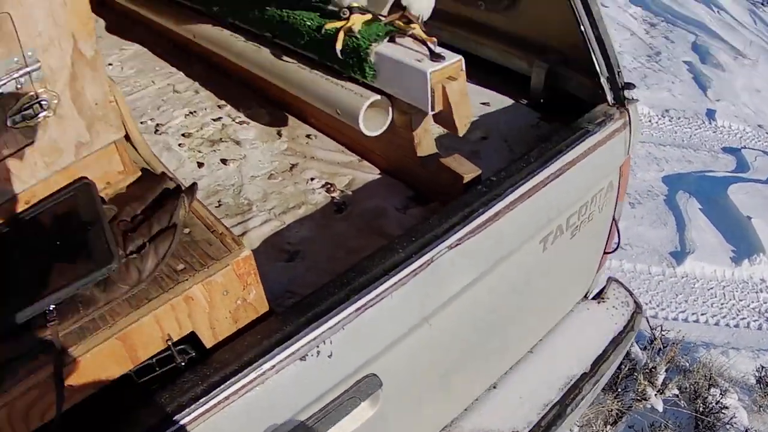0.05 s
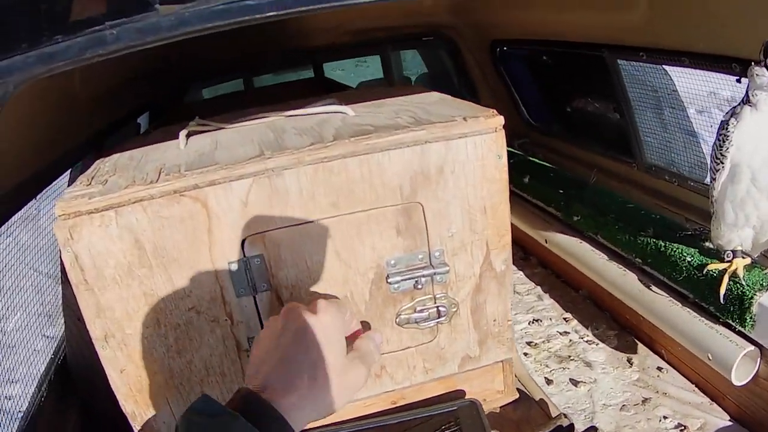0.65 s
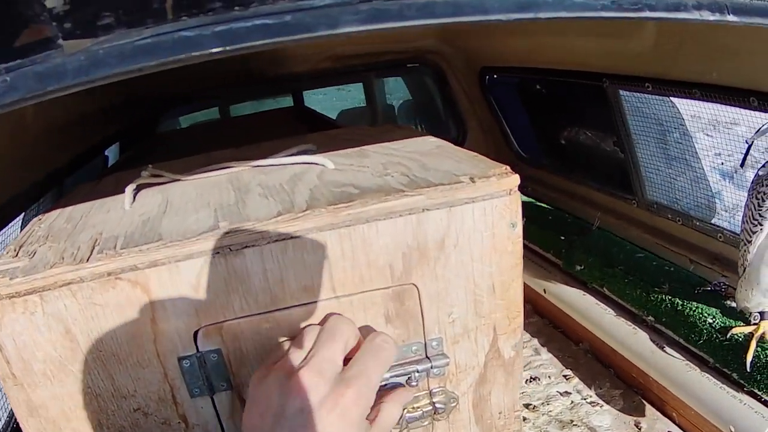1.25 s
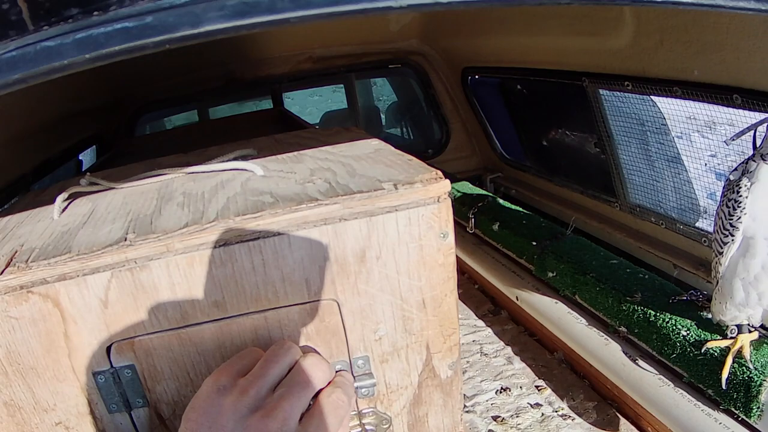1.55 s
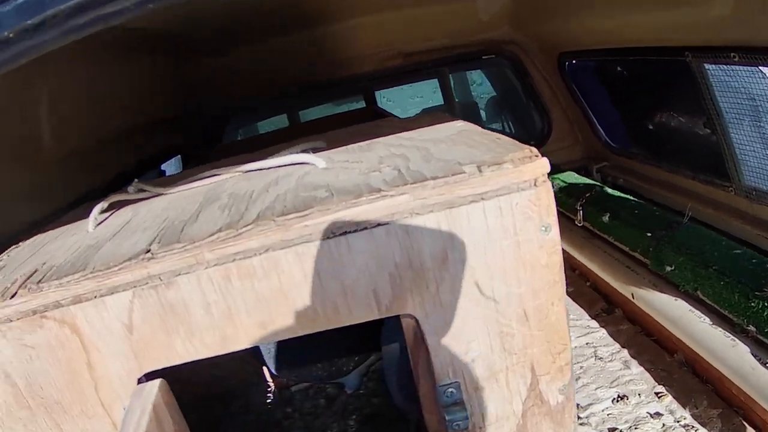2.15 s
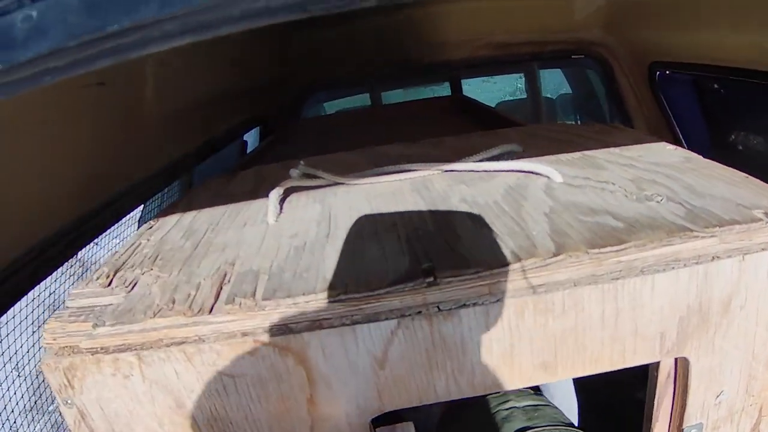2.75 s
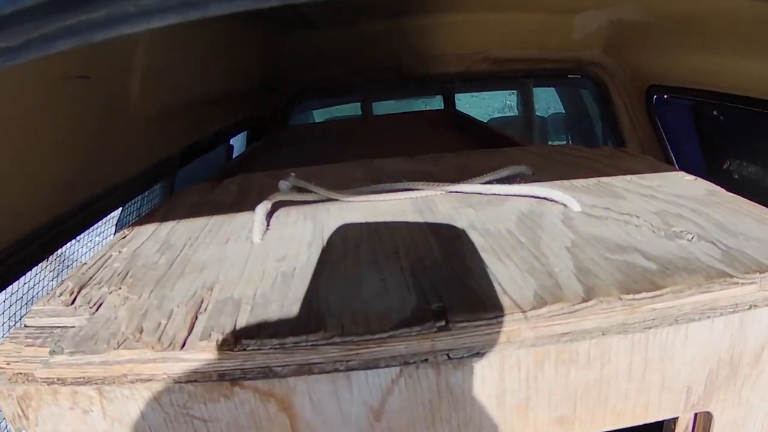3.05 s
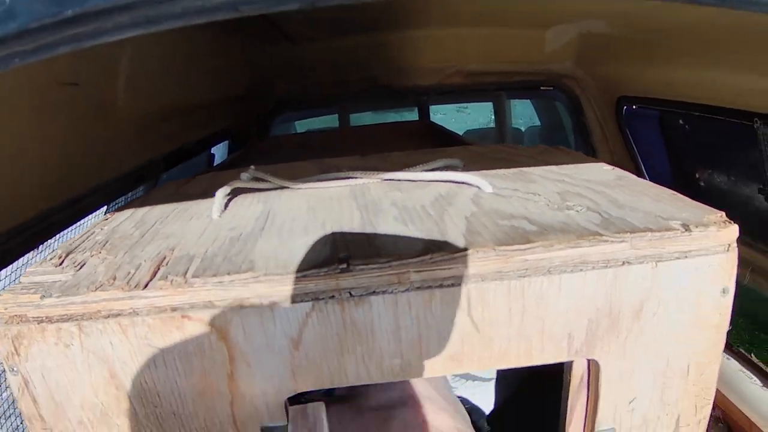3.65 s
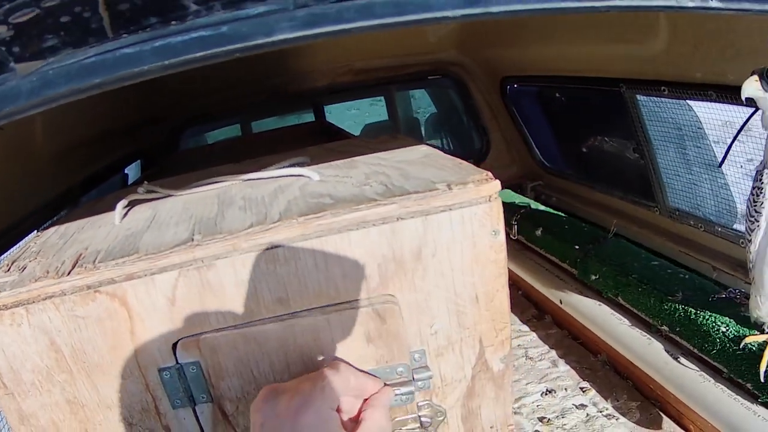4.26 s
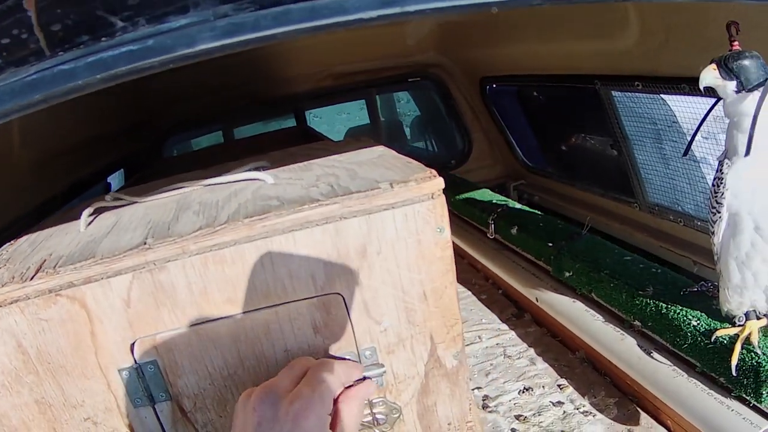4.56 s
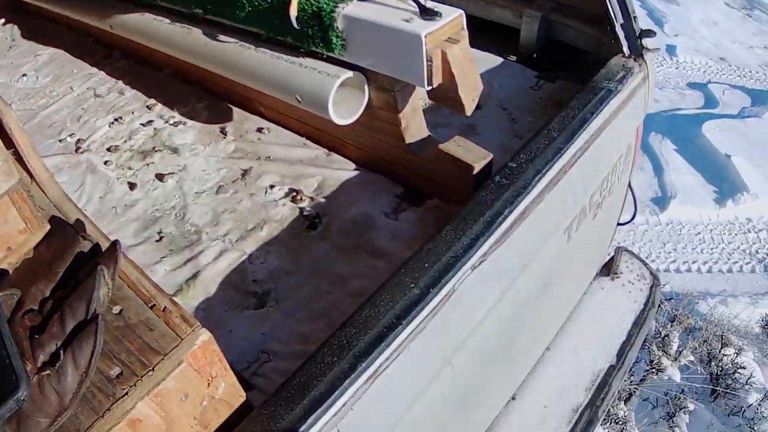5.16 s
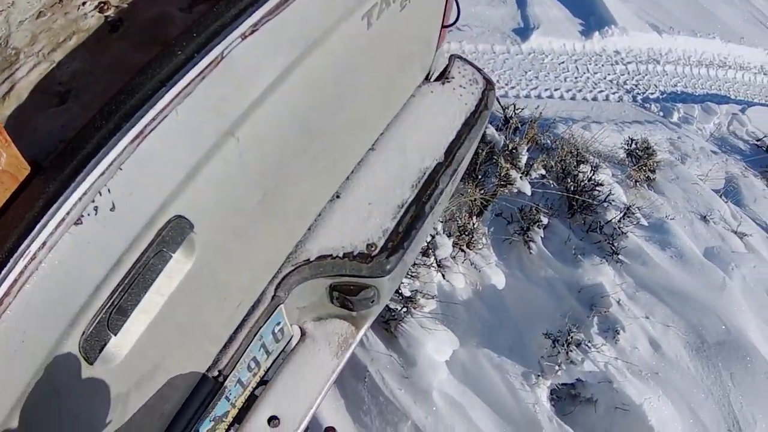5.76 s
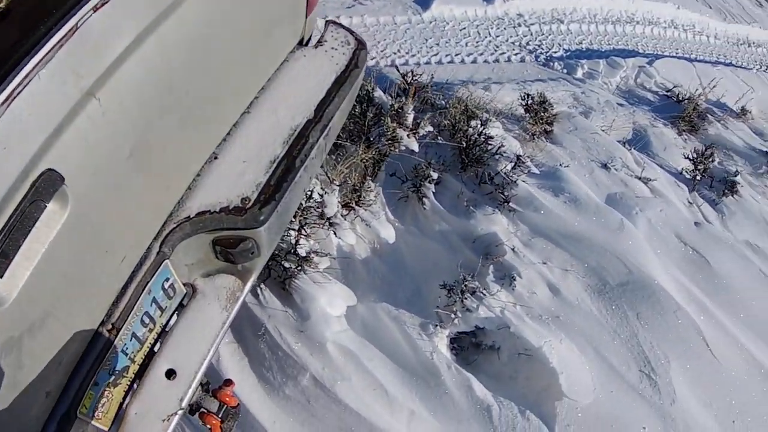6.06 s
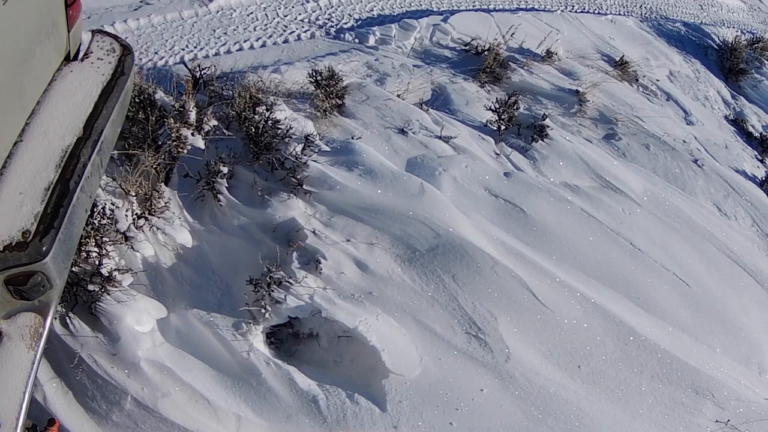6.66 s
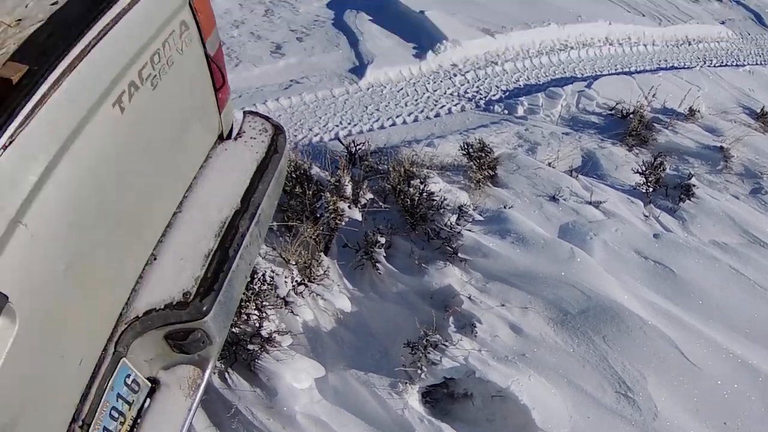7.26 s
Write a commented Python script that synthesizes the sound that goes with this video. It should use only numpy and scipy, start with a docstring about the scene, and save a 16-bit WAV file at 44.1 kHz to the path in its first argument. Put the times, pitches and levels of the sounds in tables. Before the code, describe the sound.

Close latch clacks, hollow wooden bumps and scraping, a brief hinge squeak and a shutting door, followed by creaking footsteps on cold snow.

```python
"""Close by, in quiet open air, boots crunch and creak in cold snow at the back of a pickup.
A steel bolt rattles and rasps open on a plywood box; a hand reaches in and drags something out,
bumping and rubbing the panels. The dry hinge squeaks, the small door claps shut, the bolt is
worked home and a dull thump follows. The boots shuffle again, packing snow and brushing powder.
A faint outdoor rush runs throughout, with two brief, thin whines."""
import sys
import numpy as np
from scipy import signal
from scipy.fft import rfft, irfft, next_fast_len
from scipy.io import wavfile
from scipy.ndimage import uniform_filter1d, minimum_filter1d, map_coordinates

SR = 44100
rng = np.random.default_rng(int(sys.argv[2]) if len(sys.argv) > 2 else 0)


def wav_out(sig):
    """Save sig, one row per channel (or a flat mono array), as 16-bit PCM at SR to the path in sys.argv[1]."""
    wavfile.write(sys.argv[1], SR, np.round(np.clip(np.atleast_2d(sig).T, -1, 1) * 32767).astype(np.int16))


N = 326781

# bolt and door contacts: start_s, clack_db, boom_re_clack_db, crack_re_clack_db
DOOR_KNOCKS = [(0.854, -8.5, -4, -15.5), (0.866, -16, 6.5, -8.5), (0.874, -13, 4, -9.5),
               (0.909, -20.5, -9, -12), (1.014, -10.5, -1, -13.5), (1.059, -16, 5, -23),
               (1.07, -4.5, 0.5, -16), (1.074, -21.5, 8, -8.5), (1.114, -32.5, 9, -3.5),
               (1.297, -31.5, 3, -20.5), (1.38, -35, 0, -14), (1.457, -16, 2, -18), (1.489, -11.5, -9, -18),
               (1.531, -12.5, -4.5, -14), (1.546, -20.5, -12, -14), (3.343, -19.5, -4, -13),
               (4.288, -37, 7, -28), (4.344, -9.5, 3.5, -24.5), (4.417, -13.5, -5, -19),
               (4.458, -6, 2.5, -14.5), (4.679, -20, -3, -21), (4.794, -10, 0, -19),
               (5.18, -20.5, -1.5, -36), (5.679, -27, 7, -7.5), (5.733, -30.5, -14, -17)]
# bolt and small hard parts: start_s, level_db, pitch_hz
BOLT_CLICKS = [(0.877, -27.5, 5700), (1.015, -18.5, 5320), (1.645, -38.5, 2750), (1.674, -33, 1920),
               (1.711, -26.5, 2330), (1.882, -29.5, 2034), (1.968, -36, 1620), (2.839, -45, 1890),
               (3.06, -36.5, 2010), (4.194, -46, 5000), (4.457, -18, 3580), (4.801, -31.5, 6060),
               (5.185, -41, 4970), (5.404, -48, 5400), (6.101, -37, 5030)]
# hard edges in stick-slip: centre_s, length_s, squawk_db, zing_db
EDGE_RASPS = [(0.863, 0.021, -24, -36), (1.01, 0.029, -33, -29), (1.449, 0.0079, -39, -35.5),
              (1.507, 0.029, -19, -37), (1.707, 0.019, -22.5, -28), (3.414, 0.027, -29.5, -26.5),
              (3.752, 0.032, -32.5, -41.5), (4.785, 0.012, -27, -35), (4.866, 0.028, -27, -30)]
# soft contacts with box and truck: start_s, level_db, pitch_hz
SOFT_BUMPS = [(1.16, -22.5, 976), (1.162, -13, 451), (1.171, -15, 210), (1.75, -18.5, 324),
              (1.845, -15, 237), (1.856, -16, 311), (1.876, -23, 318), (1.966, -33.5, 255),
              (2.614, -28.5, 748), (2.678, -23, 756), (2.692, -12.5, 180.5), (2.764, -19, 193),
              (3.008, -28, 730), (3.108, -28, 406), (3.187, -23.5, 215), (3.23, -18.5, 337),
              (3.313, -17, 760), (3.345, -11, 642), (3.508, -19, 306), (3.749, -13.5, 192),
              (4.359, -23, 307), (4.526, -28, 1126), (4.529, -12.5, 263), (4.953, -21.5, 310),
              (5.153, -17, 214), (5.566, -13.5, 290), (5.578, -7.5, 312), (5.585, -3.5, 124),
              (5.596, -6.5, 182.4), (5.67, -15, 197.5)]
# hand sliding on plywood: start_s, length_s, panel_db, scrape_db
HAND_STROKES = [(0.89, 0.2, -31.5, -36.5), (1.292, 0.29, -41, -45.5), (1.705, 0.057, -29, -34),
                (1.822, 0.037, -23.5, -36.5), (1.919, 0.046, -39.5, -35.5), (2.71, 0.053, -30.5, -32),
                (4.077, 0.13, -48, -54), (4.849, 0.13, -39, -43.5), (5.075, 0.1, -43, -53),
                (5.633, 0.074, -34.5, -34)]
# load sliding over the box floor: time_s, panel_db, scrape_db
LOAD_DRAG = [(2.82, -40, -43), (2.985, -45, -45.5), (3.018, -32.5, -34.5), (3.262, -27.5, -34.5),
             (3.29, -37, -31.5), (3.344, -16.5, -33), (3.398, -35.5, -28.5), (3.488, -23, -25),
             (3.6, -46.5, -56)]
# hinge swells: centre_s, length_s, level_db
HINGE_SQUEALS = [(4.002, 0.019, -34), (4.033, 0.036, -31.5), (4.087, 0.023, -38), (4.124, 0.042, -37.5)]
# boot loading the snow: start_s, length_s, level_db, pitch_hz
BOOT_STEPS = [(0.065, 0.18, -55.5, 1240), (0.388, 0.22, -38, 740), (6.19, 0.046, -40.5, 1210),
              (6.325, 0.06, -45, 1110), (6.511, 0.27, -37, 660), (6.777, 0.26, -37.5, 440),
              (7.05, 0.082, -38.5, 720), (7.213, 0.1, -44, 814), (7.294, 0.021, -37, 910)]
# boot brushing powder: start_s, length_s, level_db
BOOT_SWEEPS = [(6.6, 0.13, -42), (6.78, 0.22, -39.5), (6.826, 0.086, -41.5)]
# packed snow collapsing: start_s, level_db, pitch_hz
SNOW_CREAKS = [(0.085, -36.5, 1130), (0.572, -22, 720), (0.598, -17, 790), (0.61, -15, 723),
               (6.36, -33.5, 1130), (6.407, -28, 870), (6.701, -21, 442), (6.899, -22.5, 1090),
               (6.988, -23, 310), (7.058, -27.5, 840), (7.099, -21, 613), (7.299, -29, 994)]
# whine swells: centre_s, level_db
WHINE_SWELLS = [(2.101, -59), (5.209, -52.5)]

# modes: pitch_hz, level_db, t60_s
PANEL_MODES = [(128.5, -15.5, 0.25), (173, -12, 0.27), (201.7, 6, 0.086), (238.4, 3, 0.041),
               (302.7, -6.5, 0.22), (357, -6, 0.19), (472, 0.5, 0.11)]  # plywood and enclosed air
DOOR_MODES = [(539.4, 4.5, 0.18), (621, 9, 0.13), (900, 7, 0.1), (996, -7, 0.15), (1297, 6.5, 0.1),
              (1835, 11.5, 0.048), (1920, -4.5, 0.11), (2140, 1.5, 0.049), (2465, -12, 0.056)]  # door with hinge plates
BOLT_MODES = [(3654, 24, 0.027), (3810, 10, 0.059), (5166, 17.5, 0.066), (5700, -2, 0.057)]

# spectral shapes: freq_hz, density_db
PANEL_BOOM = [(50, -53.5), (120, -4), (200, 4.5), (330, 1.5), (480, -9.5), (800, -28.5), (2000, -71.5)]
DOOR_CLACK = [(150, -29), (350, -15), (550, -5), (1000, -1), (1500, -8.5), (2000, -15.5), (2600, -18.5),
              (3300, -21), (7000, -97)]
STEEL_CRACK = [(1000, -31), (2400, -1.5), (3000, -12), (3600, -1), (4600, -3.5), (5400, -2), (6300, -8.5),
               (7500, -24), (10500, -29.5), (15500, -24)]
WOOD_SCRAPE = [(200, -50), (450, 6), (650, 9.5), (900, 4), (1200, 1.5), (2400, -19.5), (3200, -33),
               (7000, -61)]
SNOW_CRUNCH = [(60, -54.5), (140, 7), (300, 7.5), (750, 2.5), (1100, 2), (1900, -7), (2700, -25.5),
               (15000, -36.5)]
POWDER_HISS = [(900, 1), (2000, -1), (2900, -17.5), (3700, -3.5), (4200, -10.5), (4750, -20.5), (5700, -9),
               (6400, -16.5), (7500, -27.5), (15500, -36)]
AIR_RUSH = [(60, -34.5), (130, -14.5), (350, -13.5), (520, -15.5), (1400, -21.5), (2500, -26.5),
            (15500, -35.5)]
# spectral shape of a click: pitch_ratio, density_db
CLICK_SNAP = [(.12, -11), (.3, 12.5), (.55, -6.5), (1, 7.5), (1.5, -7), (2.1, -9), (4, -35.5)]

TIME_S = np.arange(N) / SR
AGE_S = np.arange(SR // 2) / SR  # time axis of one short sound


def knocks(rebound_gap_s=.023, rebound_db=-14):
    """Steel cracks, the door clacks, the panels swing up and boom; the loose bolt rebounds twice."""
    out = np.zeros(N)
    boom, clack, crack = response(PANEL_BOOM), response(DOOR_CLACK), response(STEEL_CRACK)
    for start_s, level_db, boom_db, crack_db in DOOR_KNOCKS:
        steel = clatter(crack, t60_s=.03, tail_db=-16, tail_t60_s=.11)
        steel += .55 * ring(BOLT_MODES, attack_s=.0006)
        door = amp(-11) * clatter(clack, t60_s=.075, tail_db=-15, tail_t60_s=.16)
        door += amp(-12) * ring(DOOR_MODES, attack_s=.0005)
        panels = amp(-5.5) * ring(PANEL_MODES, attack_s=.009)
        panels += amp(-6.5) * clatter(boom, t60_s=.07, tail_db=-5, tail_t60_s=.23)
        add(out, start_s, amp(level_db) * (door + amp(crack_db - 1.5) * steel + amp(boom_db) * panels))
        delays_s = np.cumsum(rebound_gap_s * (.5 + rng.random(2)))
        for bounce, delay_s in enumerate(delays_s, 1):
            tick = clatter(crack, t60_s=.011, tail_db=-20, tail_t60_s=.26)
            add(out, start_s + delay_s, amp(level_db + crack_db + bounce * rebound_db) * tick)
    return out


def clicks():
    """Hard parts meet with no panel behind them: a snap and ping, higher for smaller parts."""
    out = np.zeros(N)
    for start_s, level_db, pitch_hz in BOLT_CLICKS:
        colour = response([(pitch_hz * ratio, db) for ratio, db in CLICK_SNAP])
        ping = .5 * ring([(pitch_hz, 0, 110 / pitch_hz)], attack_s=1 / pitch_hz)
        snap = clatter(colour, t60_s=.022, tail_db=-11, tail_t60_s=.13)
        add(out, start_s, amp(level_db) * (ping + snap))
    return out


def rasps(slip_hz=1000, waver=.25):
    """An uneven run of slips drives the steel and the door's upper modes, damped by the contact."""
    out, crack = np.zeros(N), response(STEEL_CRACK)
    upper_modes = [mode for mode in DOOR_MODES if mode[0] > 950]
    damping = decay(t60_s=.012)
    for centre_s, length_s, squawk_db, zing_db in EDGE_RASPS:
        rate_hz = slip_hz * (1 + waver * wobble(600)[:len(AGE_S)])
        pulses = np.diff(np.floor(np.cumsum(rate_hz) / SR), prepend=0)
        force = swell(AGE_S - length_s, length_s) * pulses * (1 + rng.standard_normal(len(AGE_S)))
        squawk = burst(convolve(force, damping * ring(upper_modes, attack_s=.000047)))
        bolt = burst(convolve(force, damping * ring(BOLT_MODES, attack_s=.00084)))
        zing = burst(convolve(force, crack)) + .5 * bolt
        add(out, centre_s - length_s, amp(squawk_db) * squawk + amp(zing_db) * zing)
    return out


def bumps():
    """A soft contact stirs one mode of the hollow box above the rest; low modes ring longer."""
    out = np.zeros(N)
    for start_s, level_db, hz in SOFT_BUMPS:
        colour = response([(hz / 2.4, -26), (hz, 0), (hz * 1.8, -12), (hz * 5, -42), (hz * 14, -90)])
        mode = amp(-8.5) * ring([(hz, 0, 36 / hz)], attack_s=.7 / hz)
        thud = amp(-7) * clatter(colour, t60_s=.09, tail_db=-21, tail_t60_s=.35)
        add(out, start_s, amp(level_db) * (mode + thud))
    return out


def rubbing(hiss_db=-10, hard_scrape_db=-17):
    """Coarse slips shake the panels, finer ones scrape, and cloth hisses over the wood."""
    panel_gain, scrape_gain = friction_gains()
    grip = unit(amp(3.8 * wobble(36)))
    fine = grip * slips(rate_hz=350, spread_db=3.5, smooth=.5)
    lower_modes = [mode for mode in DOOR_MODES if mode[0] < 1100]
    wood = through(fine, WOOD_SCRAPE)
    wood += amp(-12) * unit(convolve(fine, ring(lower_modes, attack_s=.00093)))
    hiss_gain = amp(hiss_db) * np.sqrt(scrape_gain / amp(hard_scrape_db))  # fades faster than the scrape
    hiss = hiss_gain * through(grip * rng.standard_normal(N), STEEL_CRACK)
    # a faint, even hiss swells with the rubbing
    faint_hiss = amp(-45) * np.sqrt(panel_gain + scrape_gain) * rng.standard_normal(N)
    rumble = through(slips(rate_hz=260, spread_db=0, smooth=.47), PANEL_BOOM)
    return amp(3.5) * panel_gain * rumble + amp(.5) * scrape_gain * (wood + hiss) + faint_hiss


def friction_gains():
    """Panel and scrape envelopes: the dragged load and the hand strokes add in power."""
    times_s, drag_panel_db, drag_scrape_db = np.transpose(LOAD_DRAG)
    inside_s = np.minimum(TIME_S - times_s[0], times_s[-1] - TIME_S)
    gate = np.clip(1 + inside_s / .02, 0, 1)
    panel = gate * amp(np.interp(TIME_S, times_s, drag_panel_db) - 1.5)
    scrape = gate * amp(np.interp(TIME_S, times_s, drag_scrape_db) + 1)
    for start_s, length_s, panel_db, scrape_db in HAND_STROKES:
        stroke = press(start_s, length_s, attack_s=.019, release_db_per_s=181)
        panel = np.hypot(panel, amp(panel_db) * stroke)
        scrape = np.hypot(scrape, amp(scrape_db) * stroke)
    return panel, scrape


def hinge():
    """The dry hinge sings one wavering note in short swells as the door swings shut."""
    envelope = sum(amp(db) * swell(TIME_S - centre_s, length_s)
                   for centre_s, length_s, db in HINGE_SQUEALS)
    pitch_hz = 1495 * (1 + .022 * wobble(200))
    flutter = amp(3.1 * wobble(130))
    return envelope * flutter * tone(pitch_hz)


def boots(packing_db=-1, packing_q=2.5):
    """Snow crystals break in clumps under the sole, each push on its own note; loose powder hisses."""
    breaking = slips(rate_hz=550, spread_db=3.5, smooth=.35) * amp(3.5 * wobble(70))
    crunch, dust = through(breaking, SNOW_CRUNCH), through(breaking, POWDER_HISS)
    out = np.zeros(N)
    for start_s, length_s, level_db, pitch_hz in BOOT_STEPS:
        note = unit(signal.lfilter(*signal.iirpeak(pitch_hz, packing_q, SR), crunch))
        push = amp(level_db) * press(start_s, length_s, attack_s=.0033, release_db_per_s=224)
        out += push * (unit(crunch + amp(packing_db) * note) + amp(-17) * dust)
    sweep = sum(amp(db) * press(start_s, length_s, attack_s=.04, release_db_per_s=323)
                for start_s, length_s, db in BOOT_SWEEPS)
    powder = through(slips(rate_hz=3400, spread_db=3.5, smooth=.69), POWDER_HISS)
    return out + sweep * powder


def creaks():
    """A packed snow layer collapses at once: a pop sinking in pitch, with a short crumble behind it."""
    out, crunch = np.zeros(N), response(SNOW_CRUNCH)
    for start_s, level_db, pitch_hz in SNOW_CREAKS:
        cycles = pitch_hz * AGE_S[:SR // 20]
        glide_hz = pitch_hz * (1 + .056 * np.exp(-cycles / 2))
        pop = cycles * np.exp(1 - cycles) * tone(glide_hz)
        crumble = clatter(crunch, t60_s=.052, tail_db=-18, tail_t60_s=.083)
        add(out, start_s, amp(level_db + 3) * pop)
        add(out, start_s, amp(level_db - 15) * crumble)
    return out


def air():
    """A faint outdoor rush."""
    return amp(-54.5) * through(rng.standard_normal(N), AIR_RUSH)


def whine(pitch_hz=5860):
    """A very faint, thin whine comes and goes."""
    envelope = sum(amp(db) * swell(TIME_S - centre_s, length_s=.08) for centre_s, db in WHINE_SWELLS)
    return envelope * np.sin(2 * np.pi * pitch_hz * TIME_S)


def ring(modes, attack_s):
    """Modes struck at random strengths and signs; the hand's grip detunes each a little."""
    hz, db, t60_s = np.transpose(modes)[:, :, None]
    strength = amp(db + rng.normal(0, 4, hz.shape)) * rng.choice([-1, 1], hz.shape)
    pitch_hz = hz * (1 + .0072 * rng.standard_normal(hz.shape))
    partials = strength * decay(t60_s) * np.sin(2 * np.pi * pitch_hz * AGE_S)
    return burst(partials.sum(axis=0) * (1 - np.exp(-AGE_S / attack_s)))


def clatter(colour, t60_s, tail_db, tail_t60_s):
    """Crowded modes that die fast, and their weaker echo under the truck's canopy."""
    envelope = decay(t60_s) + amp(tail_db) * decay(tail_t60_s)
    return burst(convolve(envelope * rng.standard_normal(len(AGE_S)), colour))


def slips(rate_hz, spread_db, smooth):
    """Random tiny slips of uneven size over a share of smooth friction noise."""
    sizes = rng.choice([-1, 1], N) * amp(spread_db * np.minimum(rng.exponential(size=N), 3))
    slipping = rng.random(N) < rate_hz / SR
    return unit(sizes * slipping) + smooth * rng.standard_normal(N)


def press(start_s, length_s, attack_s, release_db_per_s):
    """Pressure builds, holds to the end of the movement and dies away."""
    age_s = TIME_S - start_s
    return np.clip(age_s / attack_s, 0, 1) * amp(-release_db_per_s * np.maximum(age_s - length_s, 0))


def swell(offset_s, length_s):
    """Gaussian envelope, length_s wide at 1/e."""
    return np.exp(-(2 * offset_s / length_s) ** 2)


def wobble(rate_hz):
    """Smooth random curve through rate_hz knots a second."""
    return map_coordinates(rng.standard_normal(4096), [TIME_S * rate_hz], mode="mirror")


def response(spectrum, size=4096):
    """Minimum-phase impulse response of a spectral shape."""
    freq_hz, density_db = np.transpose(spectrum)
    bins_hz = np.fft.rfftfreq(size, 1 / SR)
    magnitude = amp(np.interp(np.log(bins_hz + 1), np.log(freq_hz), density_db))
    cepstrum = irfft(np.log(magnitude))
    cepstrum[1:size // 2] *= 2
    cepstrum[size // 2 + 1:] = 0
    return irfft(np.exp(rfft(cepstrum)))


def through(force, spectrum):
    """A force heard through a body with this spectrum, rms 1."""
    return unit(convolve(force, response(spectrum)))


def convolve(x, impulse):
    return signal.oaconvolve(x, impulse)[:len(x)]


def tone(pitch_hz):
    return np.sin(2 * np.pi * np.cumsum(pitch_hz) / SR)


def decay(t60_s):
    return amp(-60 * AGE_S / t60_s)


def amp(db):
    return 10 ** (np.asarray(db) / 20)


def unit(x):
    return x / np.sqrt(np.mean(x ** 2) + 1e-20)


def burst(x):
    """Scale to the energy of 10 ms at rms 1."""
    return x / np.sqrt(np.sum(x ** 2) / (SR / 100) + 1e-20)


def add(track, start_s, sound):
    start = max(round(start_s * SR), 0)
    track[start:start + len(sound)] += sound[:N - start]


def scene():
    """Box, snow and background in mono."""
    box = knocks() + clicks() + rasps() + bumps() + rubbing() + hinge()
    return (box + boots() + creaks() + air() + whine())[None]


def record(dry):
    """Bass cut before and after a peak limiter, then a sharp treble cut."""
    bass_hz, top_hz, threshold = 98, 15830, .69
    bass_cut = signal.butter(4, bass_hz, "highpass", fs=SR, output="sos")
    lean = signal.sosfilt(bass_cut, dry)
    needed_gain = threshold / np.maximum(np.abs(lean), threshold)
    smooth_gain = uniform_filter1d(minimum_filter1d(needed_gain, size=513), size=513)
    limited = signal.sosfilt(bass_cut, lean * smooth_gain)
    size = next_fast_len(N + SR // 2)
    passband = np.fft.rfftfreq(size, 1 / SR) < top_hz
    return irfft(rfft(limited, size) * passband, size)[:, :N]


dry = scene()
out = record(dry)
wav_out(out)
```